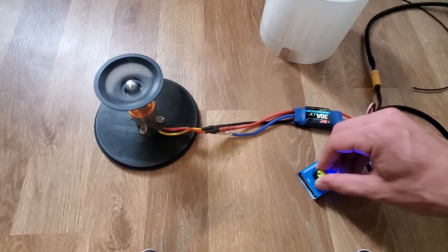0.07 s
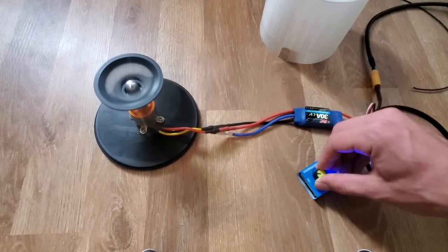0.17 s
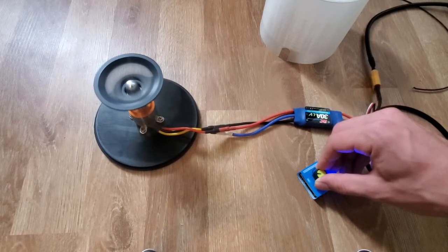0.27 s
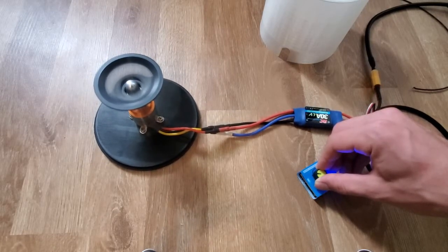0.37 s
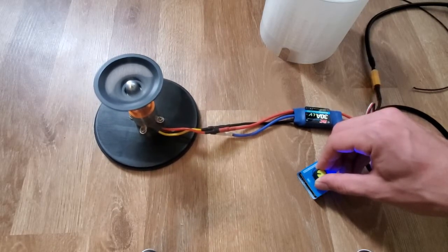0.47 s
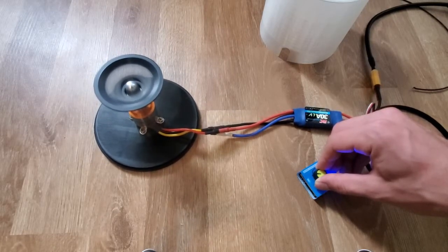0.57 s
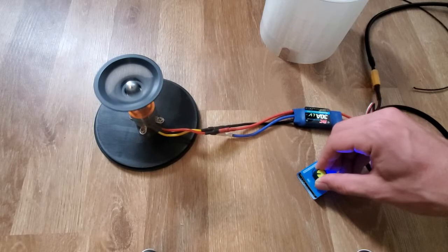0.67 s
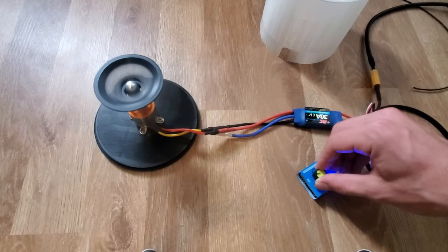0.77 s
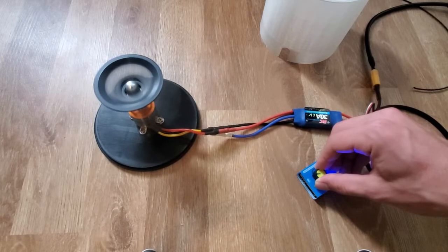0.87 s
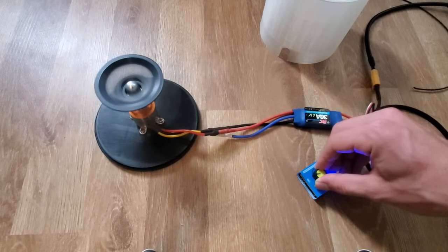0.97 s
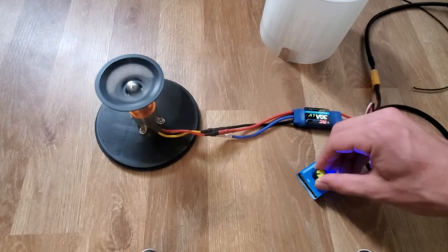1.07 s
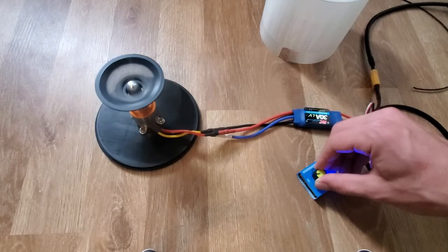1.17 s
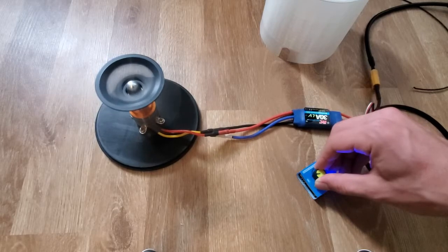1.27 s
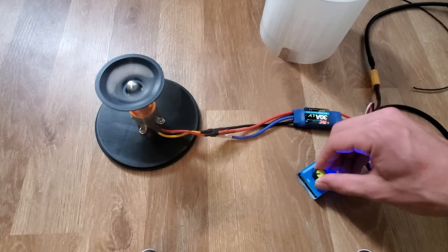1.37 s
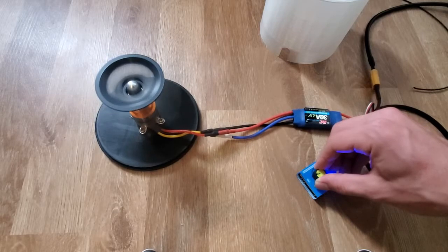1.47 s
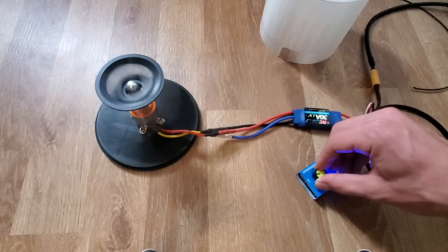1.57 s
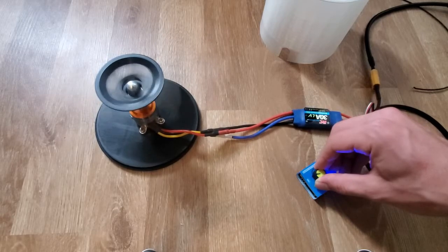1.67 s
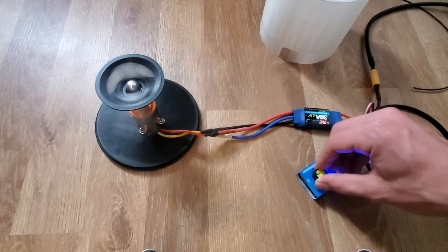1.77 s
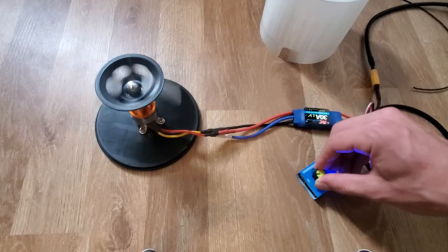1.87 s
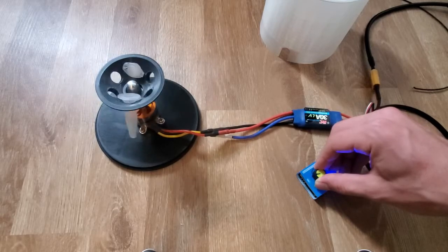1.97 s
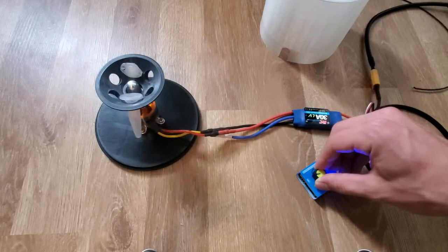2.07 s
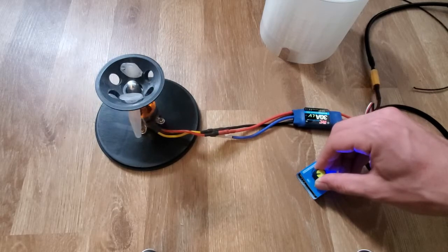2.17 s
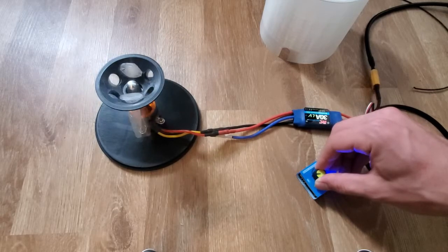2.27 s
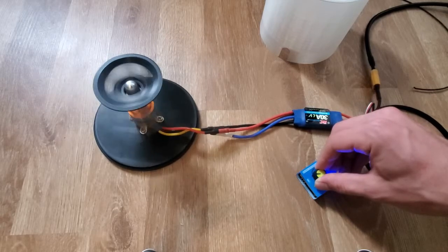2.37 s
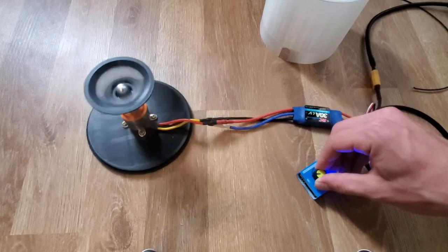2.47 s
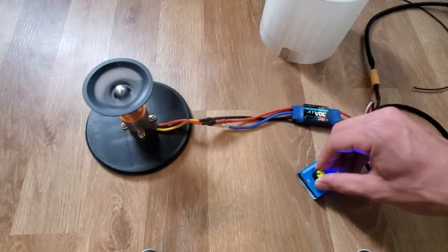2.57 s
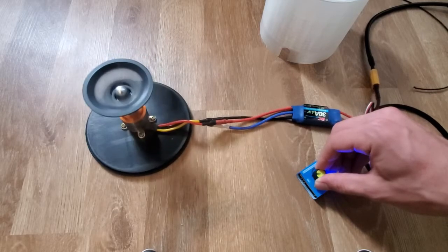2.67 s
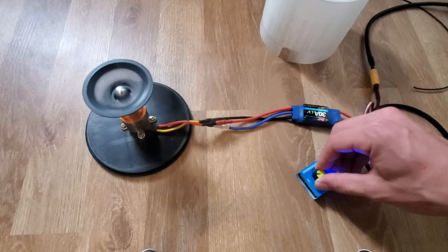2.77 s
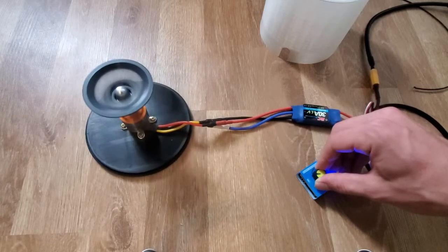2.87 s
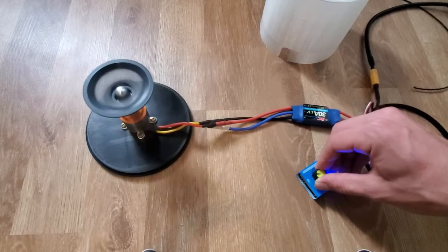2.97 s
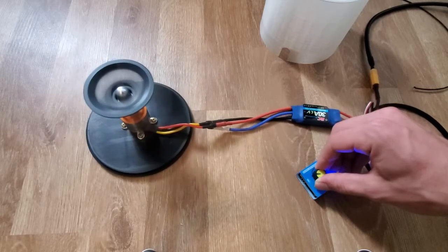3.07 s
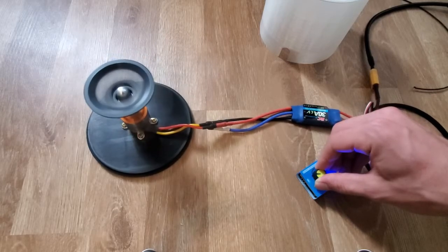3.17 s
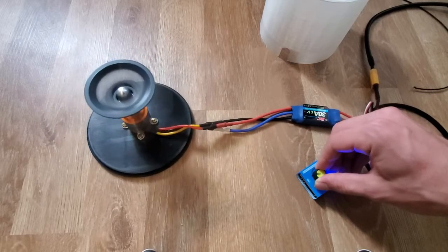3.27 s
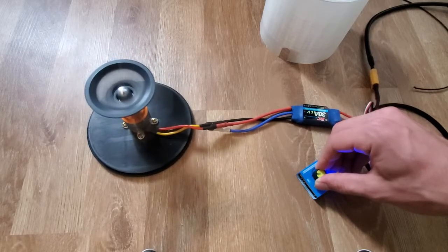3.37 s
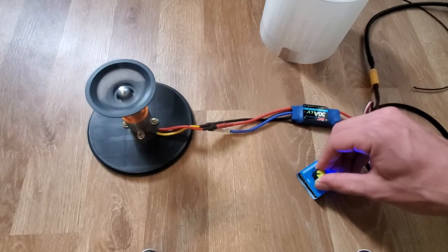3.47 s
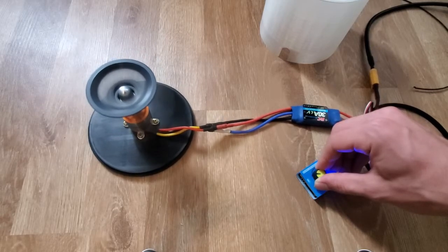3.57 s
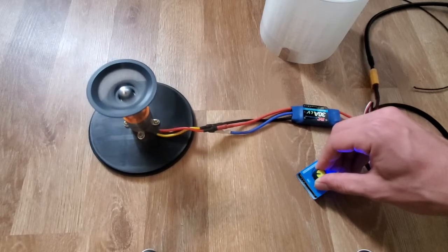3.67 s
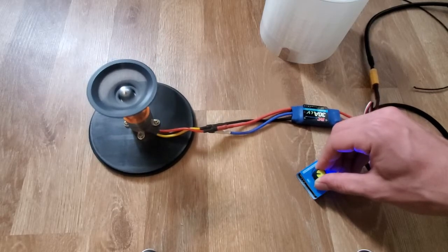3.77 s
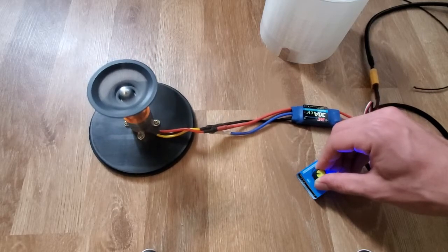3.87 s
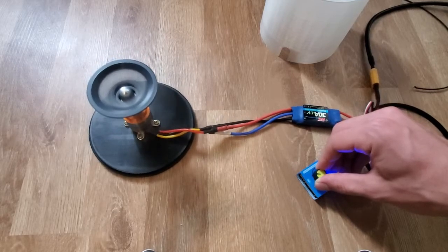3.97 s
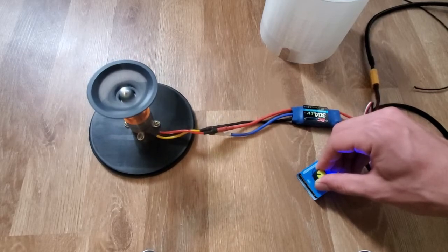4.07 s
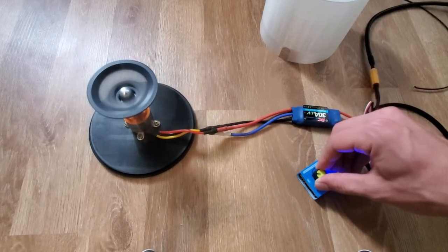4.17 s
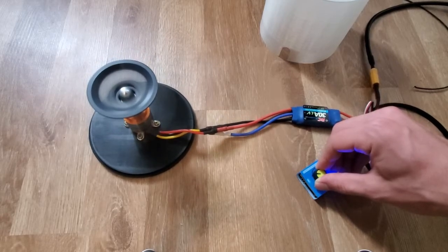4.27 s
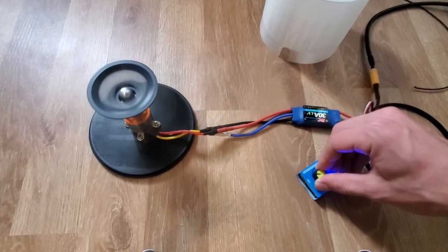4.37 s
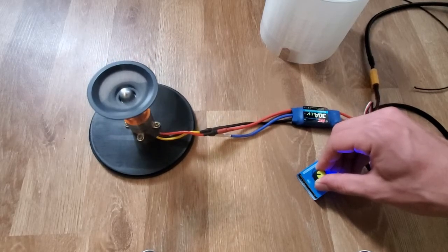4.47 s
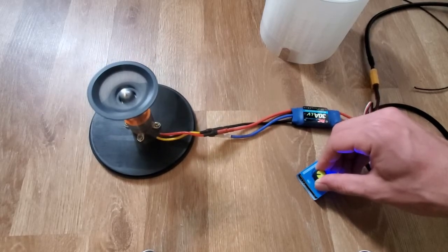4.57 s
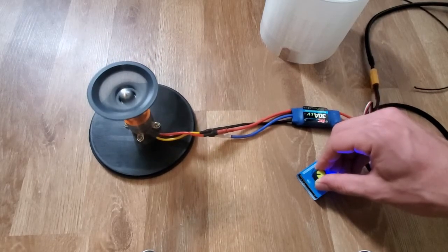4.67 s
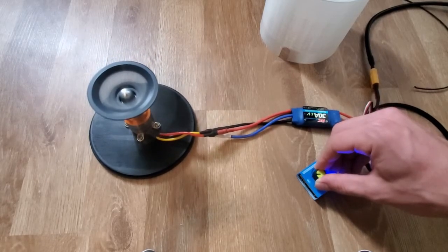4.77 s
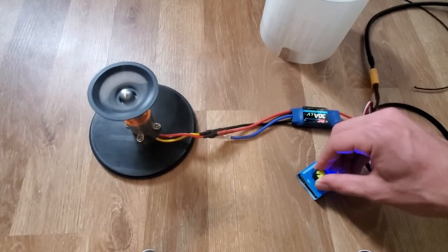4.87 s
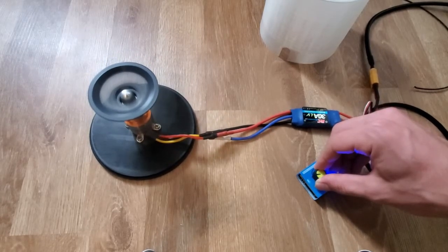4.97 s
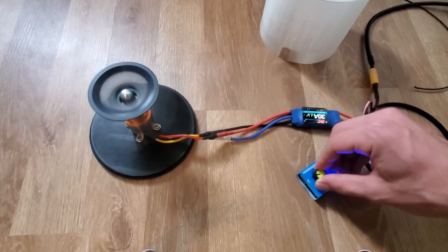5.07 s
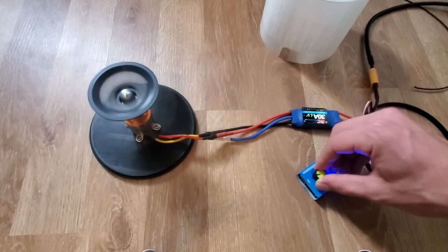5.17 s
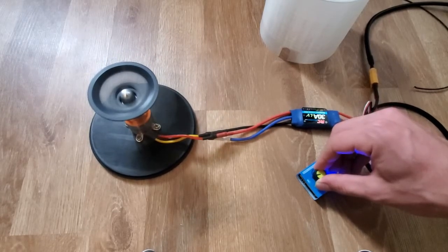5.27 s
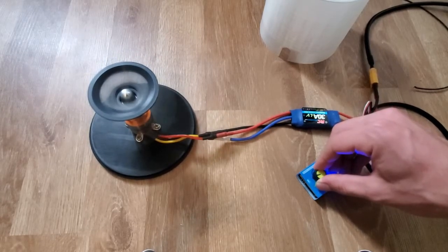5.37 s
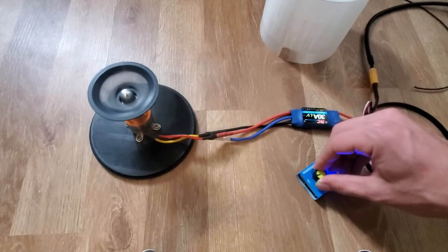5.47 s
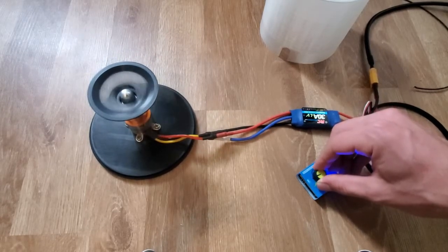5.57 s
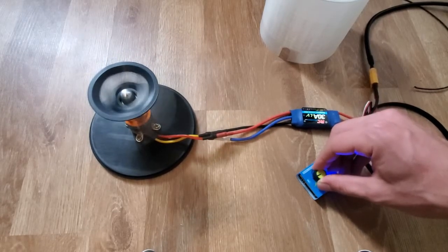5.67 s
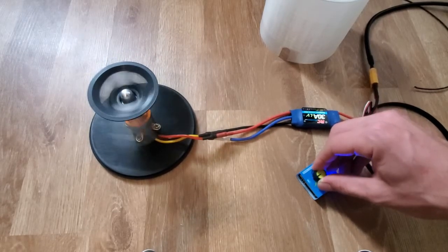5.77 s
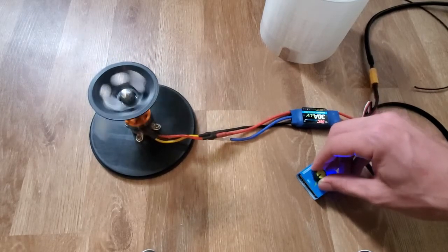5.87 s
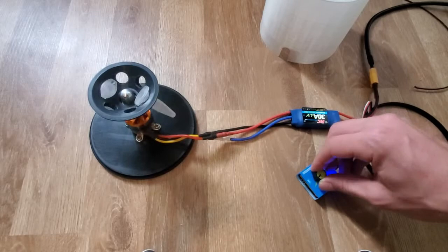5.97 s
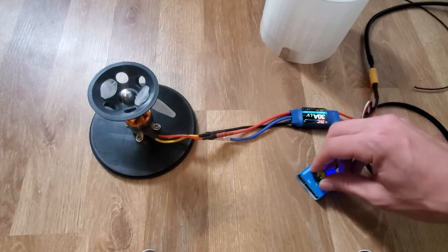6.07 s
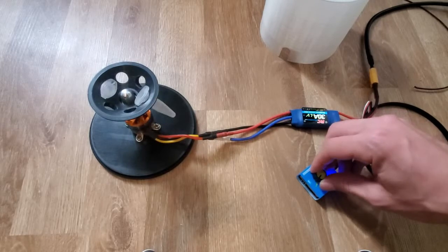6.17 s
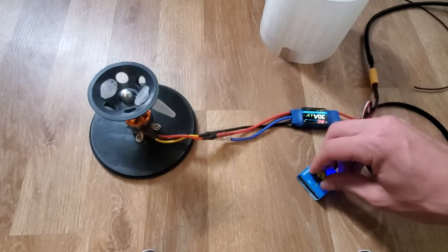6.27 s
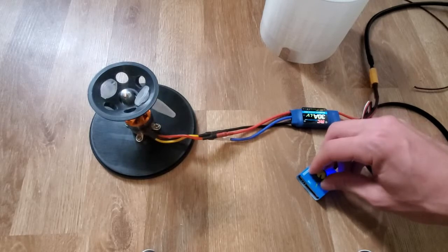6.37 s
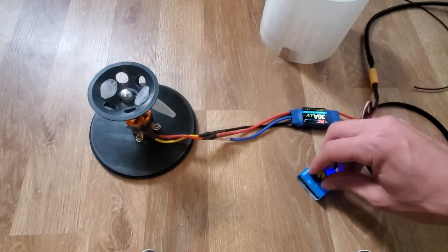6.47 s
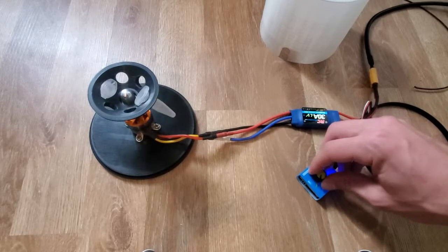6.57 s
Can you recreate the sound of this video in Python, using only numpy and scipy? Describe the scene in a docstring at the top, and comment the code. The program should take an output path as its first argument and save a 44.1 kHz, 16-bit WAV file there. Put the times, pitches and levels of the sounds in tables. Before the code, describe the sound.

A small brushless motor spins an unbalanced rotor on a loose base on a wooden floor. It starts at speed, rattling and whining, coasts down through a low hum to near silence, restarts with a sharp clatter, climbs in pitch to a steady harsh buzz, and runs down again. Thin electronic singing and hiss accompany the power. Close stereo microphone, louder left, in a small room.

```python
"""A rattling buzz with a whine over it runs down to rest, starts again with a kick and runs down once more.
A small brushless motor spins an unbalanced rotor on a loose base on a hard floor, close to two microphone ports.
The base knocks once a turn at speed, bearing and poles whine in step with the shaft, the stand hums at low speed,
and the controller sings at its switching pitch and hisses while it drives. Room and floorboards rumble beneath."""
import sys
import numpy as np
from scipy import signal
from scipy.fft import rfft, irfft, next_fast_len
from scipy.io import wavfile
from scipy.ndimage import uniform_filter1d

SR = 44100
rng = np.random.default_rng(int(sys.argv[2]) if len(sys.argv) > 2 else 0)


def file_out(sig):
    """Save sig as 16-bit WAV at sys.argv[1]."""
    # one column per channel
    cols = np.atleast_2d(sig).T
    # limit, then scale
    lim = np.clip(cols, -1, 1)
    pcm = np.round(lim * 32767).astype(np.int16)
    wavfile.write(sys.argv[1], SR, pcm)


def volts_from_decibels(level):
    """Turn decibel levels (scalar or array-like) into linear amplitude factors."""
    exponent = np.asarray(level, float) / 20
    return 10 ** exponent


N = 291942
T = np.arange(N) / SR

# controller drive, one table per run: start_s, upper_tone_db (relative), hiss_db (relative)
DRIVE = [
    [(0.0, -47.5, -41), (0.93, -44.5, -46.5)],
    [(2.303, -45.5, -60), (2.43, -35, -47), (2.53, -34.5, -53.5), (2.57, -41.5, -41), (2.76, -45.5, -41.5),
     (2.87, -41, -43), (3.68, -48, -44), (4.62, -48, -43.5), (4.86, -54, -49.5)],
]
# spells of full switching, with the low switching tone: start_s, end_s
FULL_SWITCHING = [(0, .93), (2.565, 4.855)]
# spells in which the base loses the beat of the shaft: start_s, end_s, looseness (0-1)
STRAYS = [(.465, .535, .5), (.94, 1.1, .2), (2.3, 2.75, .7), (2.75, 3.5, .1), (3.5, 3.6, .6),
          (3.6, 3.87, .04), (3.87, 3.92, .4), (4.4, 4.87, .65), (4.87, 5.1, .3)]


def evened(x, size=None):
    """Scales to unit rms, overall or over a sliding stretch of size samples."""
    power = np.mean(x ** 2) if size is None else abs(uniform_filter1d(x ** 2, size))
    return x / np.sqrt(power + 1e-20)


def curve(rows, column=1):
    """One column of a table over time, as a value per sample."""
    rows = np.array(rows)
    return np.interp(T, rows[:, 0], rows[:, column])


def spells(rows, size=265):
    """1, or the value in the third column, inside the spells; 0 outside; edges soft over size samples."""
    on = sum(((T >= row[0]) & (T < row[1])) * (row[2] if len(row) > 2 else 1.) for row in rows)
    return uniform_filter1d(on, size=size, mode="nearest")


def level(tables, column=1):
    """Gain from tables of dB rows, silent between them, with 3 ms fades."""
    on = spells([(rows[0][0], rows[-1][0]) for rows in tables], size=130)
    all_rows = sum(map(list, tables), [])
    return volts_from_decibels(curve(all_rows, column)) * on


def read(points, hz):
    """A spectrum on a log-frequency axis."""
    f, value = np.transpose(points)
    return np.interp(np.log(hz + 1), np.log(f + 1), value)


def peaks(modes, hz):
    """Complex response of resonances (centre_hz, width_hz, level_db) summed with alternating sign."""
    total = 0
    for k, (centre_hz, width_hz, db) in enumerate(modes):
        detune = (hz - centre_hz * centre_hz / (hz + 1e-9)) / width_hz
        total = total + (-1) ** k * volts_from_decibels(db) / (1 + 1j * detune)
    return total


def shaped(x, response):
    """Filters x by a function of frequency."""
    size = next_fast_len(N + 4096)
    return irfft(rfft(x, size) * response(np.fft.rfftfreq(size, 1 / SR)), size)[..., :N]


def wander(hz):
    """Slow random drift of unit rms."""
    return evened(shaped(rng.standard_normal(N), lambda f: 1 / (1 + (f / hz) ** 2)))


def tone(cycles, waver_db=2.5, waver_hz=25, blur=.15):
    """A sine on a running cycle count; strength wavers in dB, phase by blur radians rms."""
    strength = np.sqrt(2) * volts_from_decibels(waver_db * wander(waver_hz))
    phase = 2 * np.pi * (cycles + rng.random()) + blur * wander(waver_hz)
    return strength * np.cos(phase)


def noise(own=.95):
    """White noise for the two ports, partly shared: spread-out surfaces reach each port differently."""
    return evened(rng.standard_normal(N) + own * rng.standard_normal((2, N)))


def speed():
    """Shaft Hz: driven runs, each stopped by steady friction plus drag growing with the square of speed."""
    # one table per run: start_s, shaft_hz; the last row starts the coast
    shaft = [
        [(0, 197.3), (.22, 192.8), (.32, 189.3), (.55, 187), (.75, 187.6), (.85, 184), (.91, 178.5)],
        [(2.3, 0), (2.37, 11), (2.45, 69), (2.5, 98), (2.55, 117), (2.6, 130), (2.75, 152), (2.92, 168),
         (3.18, 170.2), (3.26, 173.4), (3.62, 184.6), (3.73, 191.8), (3.83, 193.6), (3.99, 198.3),
         (4.34, 200.8), (4.67, 201.2), (4.75, 199), (4.84, 190)],
    ]
    drag_even_hz, drag_per_s = 156.3, .8  # speed where air drag equals friction; rate of loss
    hz = np.zeros(N)
    for rows in shaft:
        cut_s, cut_hz = rows[-1]
        angle = np.clip(np.arctan(cut_hz / drag_even_hz) - drag_per_s * (T - cut_s), 0, 1)
        coast = drag_even_hz * np.tan(angle)
        run = np.where(T < cut_s, curve(rows), coast)
        hz = np.where(T < rows[0][0], hz, run)
    return hz


def by_speed(rows, turns):
    """Reads a table over shaft speed at every sample."""
    return np.interp(np.gradient(turns) * SR, *np.transpose(rows))


def driven():
    """True while the controller drives."""
    return spells([(rows[0][0], rows[-1][0]) for rows in DRIVE], size=1) > 0


def background(turns):
    """Quiet room rumble and the low shudder of floorboards shaken by the motor, nearly alike in both ports."""
    # room rumble spectrum: freq_hz, density_db_per_hz (relative)
    air_spectrum = [(12, -43), (20, -19.5), (43, -3.5), (60, -13.5), (116, 2.5), (177, -38), (210, -14),
                    (248, -36), (660, -55.5), (3440, -50.5), (4810, -76.5), (6360, -53.5), (16000, -74.5)]
    # floorboard shudder: shaft_hz, level_db (relative)
    shudder_levels = [(0, -67), (50, -59.5), (100, -48.5), (150, -45), (200, -43.5)]
    air, boards = rng.standard_normal((2, 1, N)) + .28 * rng.standard_normal((2, 2, N))
    air = shaped(air, lambda f: volts_from_decibels(read(air_spectrum, f)))
    shudder = shaped(boards, lambda f: peaks([(88.6, 110, 13.0), (66.5, 10, 1.5)], f) ** 2)
    shudder_gain = volts_from_decibels(by_speed(shudder_levels, turns) + 2.0 * wander(1))
    port_gain = volts_from_decibels([[1], [-1]])
    return volts_from_decibels(-55) * evened(air) + shudder_gain * evened(shudder) * port_gain


def shake(turns):
    """The unbalance pushes the floor once a turn, less so while the base strays."""
    # shaft_hz, level_db (before straying)
    shake_levels = [(95, -96), (125, -54), (150, -39), (167, -36), (178, -38.5), (188, -38.5), (200, -36)]
    gain = volts_from_decibels(by_speed(shake_levels, turns) - 5.4 * spells(STRAYS, size=1500))
    return gain * tone(turns, waver_db=2.0)


def hum(turns):
    """Low pole and ball orders and rubbing pass the main resonance of the stand as the speed sweeps."""
    # shaft_hz, level_db (while the base rests fully)
    hum_levels = [(0, -100), (14, -70), (35, -55), (62, -52), (76, -53), (88, -41), (100, -35.5),
                  (116, -38), (130, -43), (150, -47)]
    # orders per turn
    hum_orders = [6.44, 7, 12.88, 15.03, 17.17, 19.32]
    # relative level_db per order
    order_db = [-7, 0, -5, -10, -4, -3]
    # how still the base sits: start_s, end_s, share (0-1)
    resting = [(1.02, 2.0, 1), (2.315, 2.41, 1), (2.5, 2.68, 1), (2.68, 2.8, .55), (2.8, 3.4, .3),
               (5.02, 6.0, 1)]
    least_driven_db = -41  # driven windings keep the level at least here, before the resting share
    drive = sum(volts_from_decibels(db) * tone(k * turns, waver_db=2.2, waver_hz=50, blur=.8)
                for k, db in zip(hum_orders, order_db))
    drive = drive + volts_from_decibels(6) * noise(own=.2)  # rubbing
    stand = shaped(drive, lambda f: peaks([(664, 266, 0)], f) ** 2 + peaks([(1600, 500, -22)], f))
    level_db = np.maximum(by_speed(hum_levels, turns), np.where(driven(), least_driven_db, -200))
    return volts_from_decibels(level_db + 0.5 * wander(8.6)) * spells(resting, size=900) * evened(stand, size=3000)


def controller(turns):
    """Switching tones with sidebands at shaft and pole rates, over the hiss of the windings."""
    # switching pitch, lower at speed: shaft_hz, pitch_hz
    switching = [(0, 7820), (26, 7790), (100, 7764), (130, 7751), (200, 7721)]
    # switching_multiple, offset_turns
    sidebands = [(1, 0), (1, 7), (1, -7), (1, 14), (1, 21), (1, .5), (1, -.5), (1, 1), (1, -1), (2, 0),
                 (2, -7), (2, -14), (2, -21), (2, .5), (2, -1), (2, 1), (2, -2)]
    # relative level_db per sideband
    sideband_db = [0, 0.5, -2, -15, -16, -13.5, -23, -13, -16.5, -1, -15.5, -24, -19.5, -17, -18, -12, -21]
    # freq_hz, density_db_per_hz (relative)
    hiss_spectrum = [(2940, -31.5), (5000, -5), (6600, 3), (7310, -14.5), (7450, -37.5), (8020, -1.5),
                     (8170, -2), (9280, -3.5), (11300, -18.5), (16000, -2)]
    switch = np.cumsum(by_speed(switching, turns)) / SR
    gates = {1: volts_from_decibels(-42.5) * spells(FULL_SWITCHING, size=100), 2: volts_from_decibels(3.0) * level(DRIVE)}
    tones = sum(gates[m] * volts_from_decibels(db) * tone(m * switch + k * turns, waver_db=1.2)
                for (m, k), db in zip(sidebands, sideband_db))
    hiss = evened(shaped(noise(), lambda f: volts_from_decibels(read(hiss_spectrum, f))))
    return tones + volts_from_decibels(7.5) * level(DRIVE, column=2) * hiss


def whir(turns):
    """Rolling noise rings in the bell; ball and pole orders whine over it; both throb with the turn."""
    # rotor and bearing: shaft_hz, level_db (of the sum, relative)
    whir_levels = [(0, -92.5), (55, -51.5), (85, -39), (145, -33), (183, -32.5), (195, -29.5)]
    # resonances of motor bell and rotor: centre_hz, width_hz, level_db
    bell = [(1330, 390, -2.5), (1980, 280, -19), (2528, 34, 9), (2870, 140, 12), (3710, 510, 9.5),
            (4326, 230, 15.5), (6280, 360, -3), (9100, 950, -20.5), (14600, 1500, -38)]
    # relative level_db per ball order
    ball_db = [-14, -13, -3, 0, 1, -14, -2, -1, 2, -14, -18, -14, -20]
    # pole orders per turn
    pole_orders = [7, 14, 18.5, 21, 24.5]
    # relative level_db per pole order
    pole_db = [-8, -14, -7, -1, -8]
    # how clearly the orders stand out: shaft_hz, level_db (before load)
    whine_levels = [(0, -10), (80, -7), (120, -4), (150, -1), (180, -1.5), (186, -6.5), (200, -4)]
    # whine colouring: freq_hz, gain_db
    whine_path = [(900, -14), (1500, -10), (2200, -4), (2800, 2), (4100, 0), (4700, -3), (5200, -18),
                  (7000, -28)]
    balls_per_turn, ball_orders = 2.1468, range(5, 18)
    load_db, poles_coasting_db = 3, -6  # whine gain under full switching; unpowered poles sing less
    driven_db, kick_db, kick_s, rise_s = -31, -25, 2.303, .03  # least driven level, dipping at the kick
    give, give_db = .9, -2.5  # the rush drops give dB per dB of order clarity above give_db

    throb = np.cos(2 * np.pi * turns)
    rush = (1 + 0.14 * throb + 0.058 * wander(46)) * noise()
    # a broad weak peak fills the gaps between bell modes
    rush = evened(shaped(rush, lambda f: abs(peaks(bell, f)) + abs(peaks([(2310, 880, -25)], f))))

    balls = sum(volts_from_decibels(db) * tone(k * balls_per_turn * turns, waver_db=1.3, blur=.25)
                for k, db in zip(ball_orders, ball_db))
    poles = sum(volts_from_decibels(db) * tone(k * turns, waver_db=1.8, blur=.3) for k, db in zip(pole_orders, pole_db))
    load = spells(FULL_SWITCHING, size=4000)
    clear_db = by_speed(whine_levels, turns) + load_db * load
    whine = balls + volts_from_decibels(poles_coasting_db * (1 - load)) * poles
    whine *= (1 + .4 * throb) * volts_from_decibels(clear_db)
    # one sharp bell mode at 4480 Hz
    whine = shaped(whine, lambda f: volts_from_decibels(read(whine_path, f)) * (1 + peaks([(4480, 60, 6)], f)))

    least_db = driven_db + kick_db * np.exp(-abs(T - kick_s) / rise_s)
    level_db = np.maximum(by_speed(whir_levels, turns), np.where(driven(), least_db, -200))
    rush_gain = volts_from_decibels(-1.5 - give * np.maximum(clear_db - give_db, 0))
    return volts_from_decibels(level_db + .7 * wander(8)) * (rush_gain * rush + volts_from_decibels(-7) * whine)


def knocks(turns):
    """One blow a turn at speed, strong and weak in turn; a loose base strays in time and strength."""
    # base on the floor, one table per spell: start_s, level_db
    knock_levels = [
        [(0.0, -21.5), (0.33, -20.5), (0.53, -25.5), (0.57, -22), (0.95, -24.5), (1.06, -45)],
        [(2.395, -82), (2.409, -28), (2.501, -33), (2.53, -42)],
        [(2.74, -54.5), (2.8, -36.5), (3.47, -31), (3.55, -25), (3.6, -26), (3.87, -23.5), (4.23, -23),
         (4.7, -23), (4.96, -24.5), (5.03, -32)],
    ]
    # what a knock rings with: centre_hz, width_hz, level_db
    base = [(282, 120, -6.5), (377.5, 23, -1.5), (531, 169, 3.5), (693, 217, -0.5), (840, 44, -7.5),
            (1430, 84, -12.5), (1760, 247, -13)]
    # dry edge of a knock: freq_hz, density_db_per_hz (relative)
    clack_spectrum = [(530, -37), (900, -14.5), (1620, -9.5), (1770, -25.5), (2270, -10.5), (2830, -1.5),
                      (4250, -4), (5040, -9), (6800, -8), (7400, -40), (16000, -33.5)]
    # spells in which strong and weak knocks differ less: start_s, end_s, alternation (0-1)
    even = [(0, .94, .8), (3.92, 4.39, .45)]
    steady_looseness, chatter_hz, chatter_decay_s = .035, 130, .0046
    # below chatter_hz the base chatters at that rate of its own
    beat = turns + np.cumsum(np.maximum(chatter_hz - np.gradient(turns) * SR, 0)) / SR
    at = np.flatnonzero(np.diff(np.floor(beat)))
    chance = rng.standard_normal((len(at), 2))
    loose = steady_looseness + spells(STRAYS, size=1500)[at]
    alternation = 1 - spells([(a, b, 1 - c) for a, b, c in even])[at]
    odd = alternation * (np.arange(len(at)) % 2)
    shift = np.gradient(at) * (.04 * odd + .45 * loose * chance[:, 0])
    at = np.clip(at + shift, 0, N - 1).astype(int)
    blows = np.zeros(N)
    np.add.at(blows, at, volts_from_decibels(-4.5 * odd + 1.8 * loose * chance[:, 1]))
    ring = shaped(blows, lambda f: peaks(base, f) / (1 + (210 / (f + 1)) ** 4))
    chatter = signal.lfilter([1], [1, -np.exp(-1 / (chatter_decay_s * SR))], blows) * noise()
    clack = shaped(chatter, lambda f: volts_from_decibels(read(clack_spectrum, f)))
    gain = level(knock_levels) * volts_from_decibels(1.1 * wander(17))
    return gain * (evened(ring, size=4000) + volts_from_decibels(-12.0) * evened(clack))


def room(x):
    """Decaying reflections, other ones for each port; the bass is thinned out of them."""
    length, decay_60db_s = 12000, .29
    taps = np.zeros((2, length))
    at = np.arange(120, 11980, 20) + rng.integers(0, 20, (2, 593))
    np.put_along_axis(taps, at, rng.choice([-1., 1.], at.shape), axis=1)
    taps *= volts_from_decibels(-60 * np.arange(length) / SR / decay_60db_s)
    thin = shaped(x, lambda f: 1 / (1 + (550 / (f + 1)) ** 2))
    return signal.fftconvolve(thin[None], taps / np.linalg.norm(taps[0]), axes=1)[:, :N]


def scene():
    """The motor reaches the left port first and louder, since that port faces it."""
    # freq_hz, left_over_right_db
    left_db = [(60, 2), (200, 2), (380, 5.5), (700, 6), (1290, 7), (2380, 8), (4400, 8.5), (8120, 6.5),
               (15000, 12.5)]
    # freq_hz, left_lead_rad
    left_lead = [(0, 0), (700, .8), (1640, 2.4), (3010, 3.5), (4050, 4.2), (6460, 4.7), (9040, 11),
                 (15400, 20)]
    turns = np.cumsum(speed()) / SR
    motor = shake(turns) + hum(turns) + controller(turns) + whir(turns) + knocks(turns)
    heard = motor + volts_from_decibels(-9) * room(motor.mean(axis=0))
    side = np.array([[.5], [-.5]])
    lead = np.transpose(left_lead)
    ports = shaped(heard, lambda f: volts_from_decibels(side * read(left_db, f)) * np.exp(1j * side * np.interp(f, *lead)))
    return ports + background(turns)


def low_pass(x):
    """Removes everything above the highest recorded frequency."""
    return signal.sosfilt(signal.butter(12, 16760, fs=SR, output="sos"), x)


def record(dry):
    """Limits the band to 15.76 kHz with a steep linear-phase lowpass."""
    edge = signal.firwin(801, 15760, window=("kaiser", 9), fs=SR)
    mix = signal.oaconvolve(dry, edge[None], "same")
    return low_pass(mix)


dry = scene()
out = record(dry)
file_out(out)
```